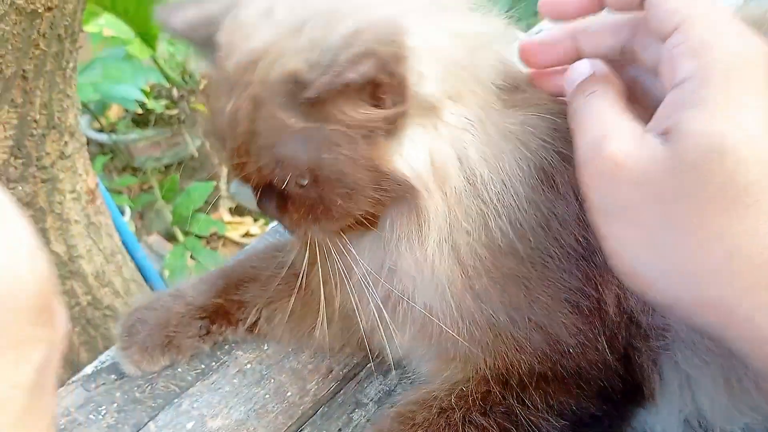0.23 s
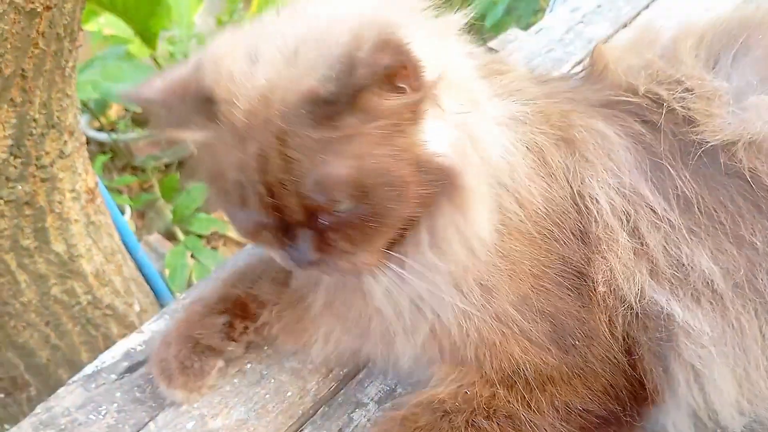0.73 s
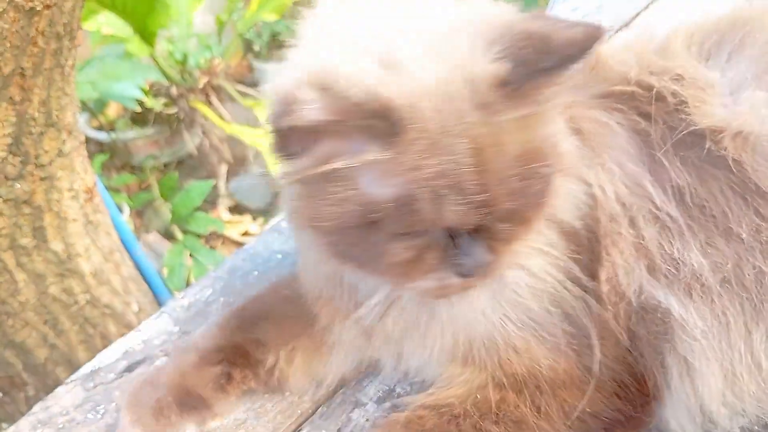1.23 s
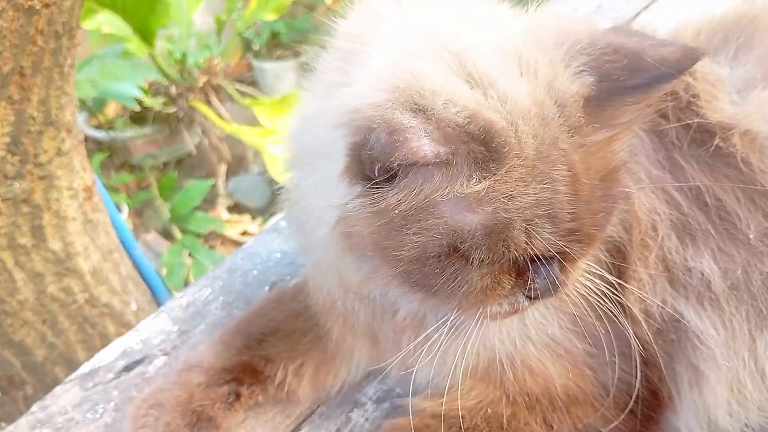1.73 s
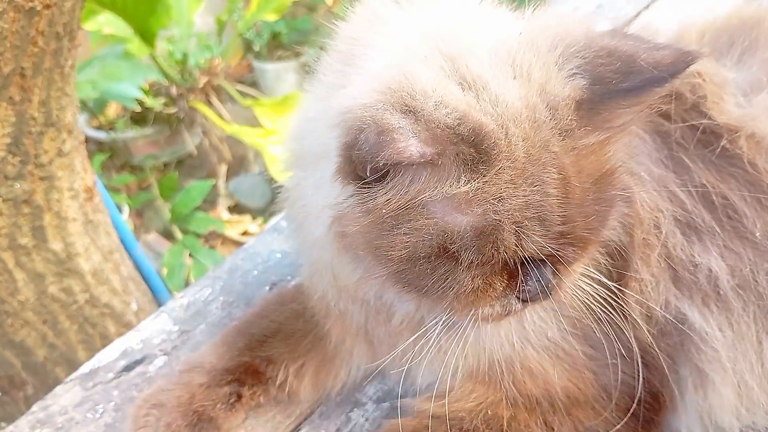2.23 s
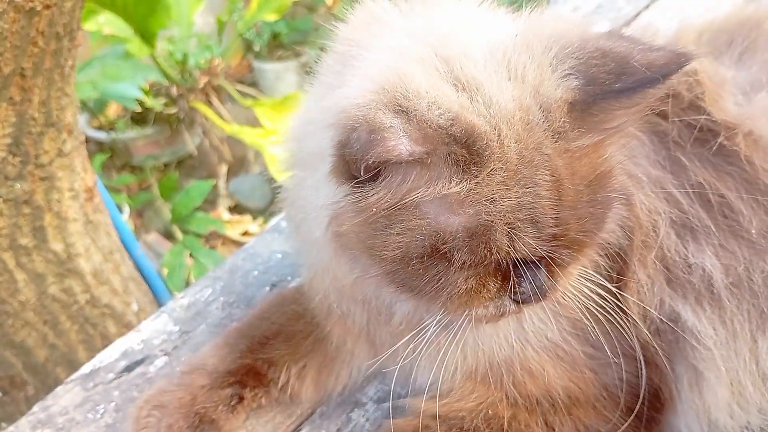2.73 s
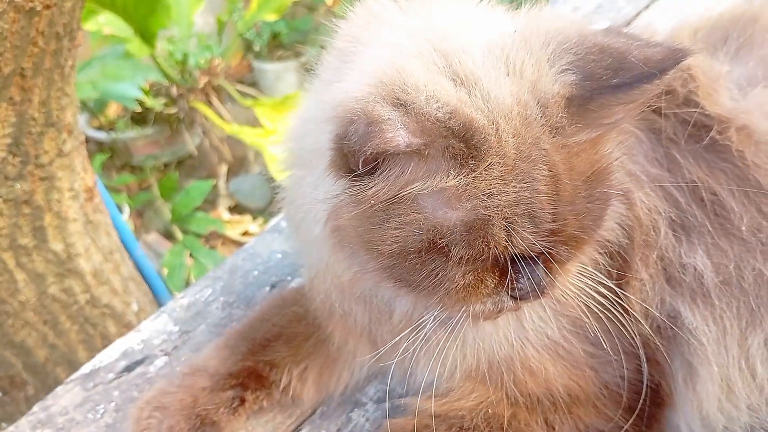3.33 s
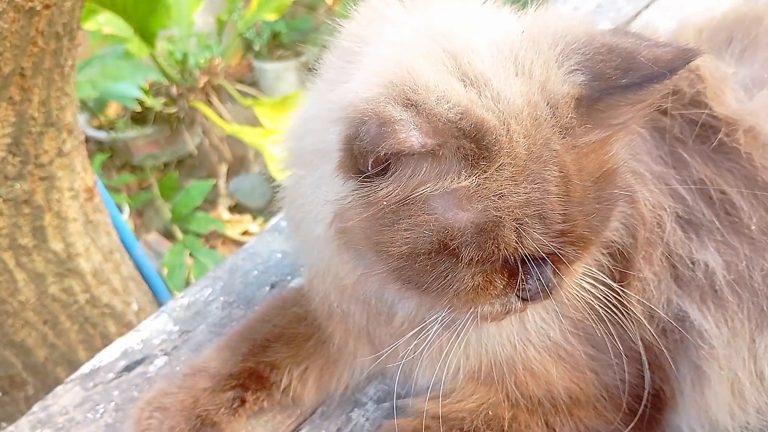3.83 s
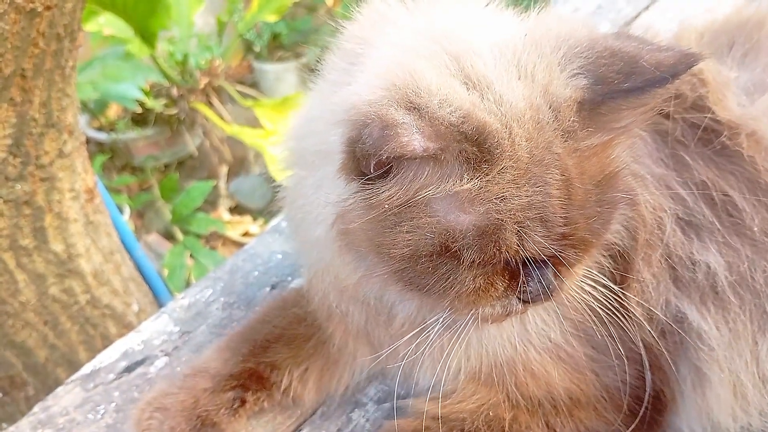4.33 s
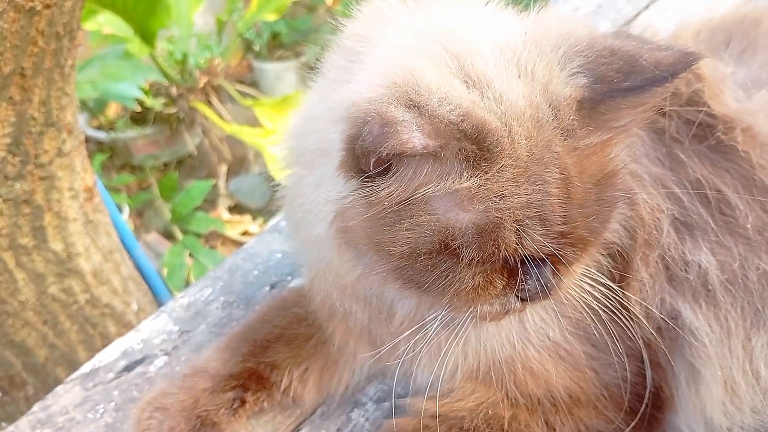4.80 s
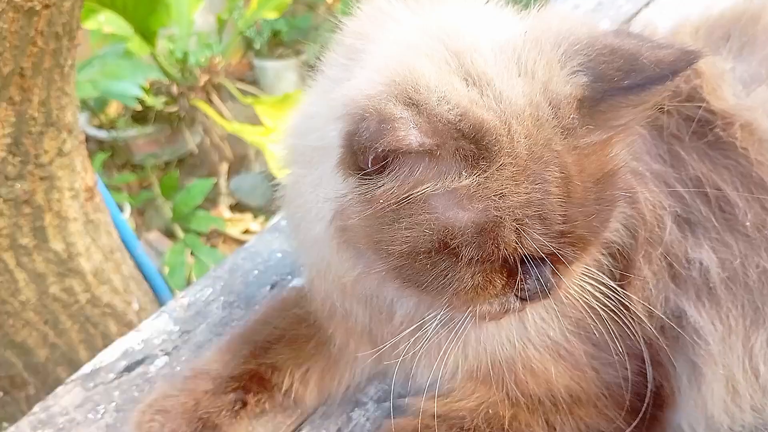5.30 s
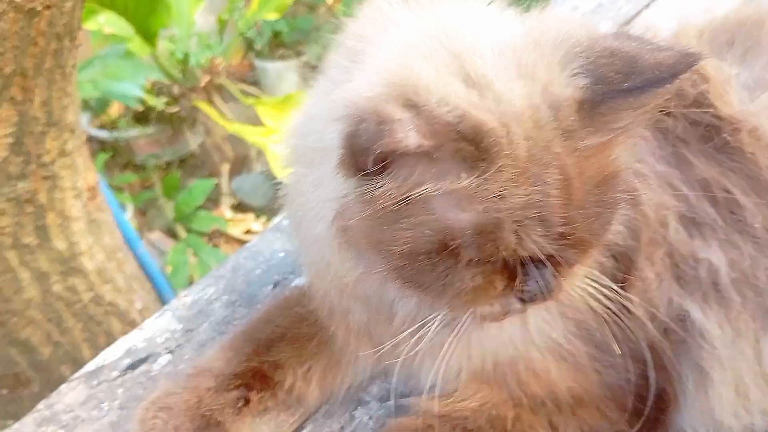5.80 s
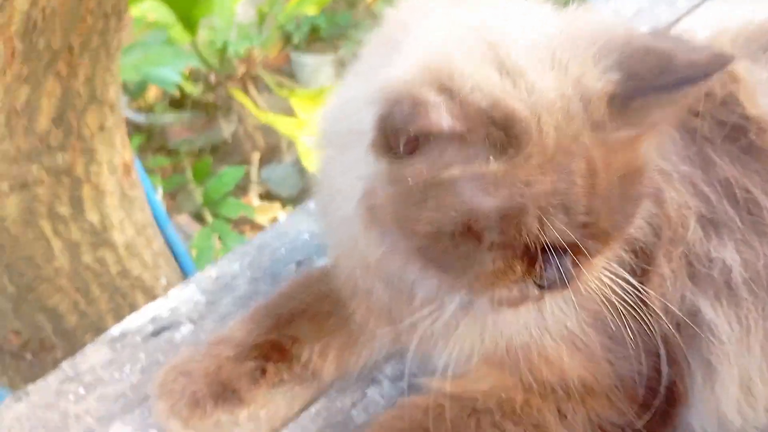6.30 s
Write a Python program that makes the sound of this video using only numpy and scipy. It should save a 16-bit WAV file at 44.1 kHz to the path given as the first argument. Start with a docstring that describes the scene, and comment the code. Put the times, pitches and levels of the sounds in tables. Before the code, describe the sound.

A quiet garden between house walls, with low traffic rumble, airy wash, faint high hiss and a distant motor throughout. A small bird gives a falling whistle and zigzag chirrup about every 0.6 seconds, pausing longer around 3 seconds; far birds pipe evenly, thin and blurred. A dove note fades at the start. Soft brushing comes near 0.4, small ticks at 0.8, then gritty metal scraping with brief squeals from 1 to 1.5. The dove coos from 1.0, strongest between 1.7 and 2.5, fluttering and rolling, ending near 3. A brush and one pure far whistle pass around 2.8, then wooden knocks at 3.05 and 3.25. Motor and whine swell around 3.7 to 4.3. Metal squeals brightly at 4.9 and again at 5.7 beside a firm brush. The dove returns from 5.2 to 6.2, with rustles, ticks and two knocks near 6.4 and a last coo starting at the end.

```python
"""A garden between house walls: filtered noise for traffic and air, motor harmonics, thin far tones.
From the start a small bird repeats gliding sine whistles and chirrups, and far birds pipe short arched sines.
Soft brushes and ticks (shaped noise) follow, and metal scrapes: noise-driven modes, with squealing sines.
A dove rolls through low phrases of near-sine coos; one pure far whistle sounds, then wooden modes knock.
The motor and whine swell, metal scrapes and squeals again, and the dove returns over late brushes and knocks."""
import sys
import numpy as np
from scipy import signal
from scipy.fft import rfft, irfft
from scipy.io import wavfile
from scipy.ndimage import uniform_filter1d

SR = 44100
rng = np.random.default_rng(int(sys.argv[2]) if len(sys.argv) > 2 else 0)


def unload_audio(sound):
    """Save the sound as a 16-bit wav file, at the path given as the first command line argument."""
    columns = np.transpose(np.atleast_2d(sound))
    # keep every value between -1 and 1, then stretch to whole-number steps
    steps = np.round(np.clip(columns, -1, 1) * 32767)
    wavfile.write(sys.argv[1], SR, steps.astype(np.int16))


N = 288855
TIME_S = np.arange(N) / SR

# Background levels. Each row: time in seconds, traffic in dB, open air in dB, high hiss in dB before its share.
BACKGROUND_LEVELS = [(0, -40, -45.5, -59), (1.2, -42.5, -46.5, -59), (1.7, -44.5, -48.5, -58),
                     (2.5, -46, -43.5, -50.5), (3.3, -42, -46, -53.5), (4.3, -43.5, -47, -55),
                     (5, -39, -46, -59.5), (5.6, -45.5, -43.5, -55), (6.55, -38.5, -45, -62)]
# Noise colours. Each row: frequency in Hz, density in dB per Hz.
TRAFFIC_COLOUR = [(30, -25), (50, -27), (63, -7), (77, 1.5), (100, 4), (125, -6), (180, -9.5), (260, -18.5),
                  (500, -55.5)]
AIR_COLOUR = [(100, -5.5), (200, 1.5), (300, 1.5), (500, -4.5), (800, -6), (1200, -12.5), (1700, -11),
              (2200, -15.5), (3200, -16.5), (5000, -23.5), (7000, -39.5), (12000, -51)]
HISS_COLOUR = [(2000, -6), (3000, -1), (3900, 14.5), (4500, -4.5), (5100, -18), (7000, -92)]
MIC_HISS_COLOUR = [(2500, -18), (5000, 0.5), (7000, -3.5), (9000, -3), (12000, -11), (16000, -14)]
MIC_HISS_DB = -65
# Garden reverberation. Each row: frequency in Hz, T60 in seconds.
GARDEN_T60 = [(100, .5), (650, 0.61), (3000, 0.14), (8000, 0.24)]
CUTOFF_HZ = 15600

# Far motor. Each row: time in seconds, firings per second, level in dB.
MOTOR_CURVE = [(0, 26.6, -48.5), (3.2, 21.8, -42.5), (3.7, 23, -38), (4.1, 24.4, -37), (5, 24.3, -42.5),
               (5.5, 22.9, -45.5), (6.55, 24.5, -47.5)]
# Motor harmonics. Each row: multiple of the firing rate, relative level in dB.
MOTOR_ORDERS = [(2, -19), (4, 2.5), (6, -2), (7, 0), (8, -6), (12, -12.5)]

# Far tones: thin whine, high trill, one long clean whistle. Each row: time in seconds, pitch in Hz, level in dB.
WHINE_CURVE = [(0, 3340, -66), (.95, 3080, -67), (1.6, 3130, -62), (2.4, 3065, -57), (2.8, 3150, -62),
               (3.1, 3096, -61), (3.7, 3100, -52), (4.3, 3010, -54), (5, 3037, -57), (6.55, 2994, -67)]
TRILL_CURVE = [(0, 4410, -64), (1.7, 4314, -61), (2.2, 4580, -56), (2.6, 4507, -60), (3.3, 4420, -59),
               (4, 4290, -60.5), (4.8, 4207, -59), (5.5, 4076, -66), (6.55, 3996, -67)]
LONG_WHISTLE_CURVE = [(2.74, 3116, -62), (2.77, 3160, -45), (2.805, 3160, -44), (2.85, 3110, -51),
                      (2.89, 3040, -50), (2.945, 3170, -47), (2.975, 3150, -68)]

# Thin far notes, pitched below the trill, following the high hiss in strength.
CHORUS_PER_S, CHORUS_DB, CHORUS_SPAN_HZ = 55, -3, 998
# Evenly paced far piping. Each row: time in seconds, pitch in Hz, level in dB.
PIPING_CURVE = [(.06, 1830, -43.5), (.22, 1858, -42.5), (.54, 1817, -42), (.86, 1808, -43.5),
                (1.18, 1793, -47.5), (1.5, 1788, -51.5), (2, 1805, -56.5), (2.45, 1697, -55),
                (2.77, 1575, -58), (2.95, 1582, -49), (3.25, 1573, -49.5), (3.41, 1647, -47),
                (3.57, 1642, -43), (3.89, 1627, -50.5), (4.05, 1700, -56.5), (4.35, 1702, -53),
                (4.52, 1779, -51), (4.68, 1821, -51), (5.5, 1771, -50.5), (6.5, 1780, -55)]
FIRST_PIPE_S, PIPE_EVERY_S = .052, .159
# Shares of the pitch: mean sag over a pipe; droop at both ends of any far note.
PIPE_FALL, FAR_ARCH = .015, 0.0225
# Lower answers of a second far bird, then faint high chips of another.
# Each row: start in seconds, pitch in Hz, level in dB, fall as a share of the pitch.
ANSWERS = [(-.02, 1720, -41.5, 0.082), (.08, 1597, -45.5, 0.024), (.17, 1567, -43, 0.015),
           (.375, 1710, -53, 0.097), (.585, 1640, -48, 0.152), (.88, 1665, -48, 0.18)]
CHIPS = [(.55, 5600, -56, 0.13), (1.08, 5450, -53, 0.089), (3.185, 5780, -50.5, 0.089),
         (3.24, 5570, -65, 0.079), (3.87, 5410, -47, 0.15), (4.03, 4630, -49, .02)]

# Metal scrapes, perhaps a gate. Each row: start, peak and end in seconds, level in dB,
# grit and hiss in dB against the ring.
SCRAPES = [(0.974, 1.015, 1.22, -49, 2.5, -13), (1.148, 1.203, 1.51, -48, 5.5, -18),
           (1.31, 1.39, 1.5, -49.5, 8.5, -32), (4.785, 4.903, 5.12, -40.5, -10, -8.5),
           (5.687, 5.76, 5.87, -41, -12, -12.5)]
# Metal modes of the ring, then of the bite. Each row: frequency in Hz, half bandwidth in Hz, level in dB.
SCRAPE_MODES = [(2320, 14, -6), (2406, 18, -2), (2680, 18, -8), (2860, 9.7, -0.5), (3000, 37, -3.5),
                (3290, 5.6, -2.5), (3600, 40, -14), (3830, 15, -13), (4900, 78, -24.5)]
BITE_MODES = [(6050, 60, -12), (6820, 69.8, -9), (7750, 50, -6), (8300, 34.6, 1), (8600, 44, -9),
              (12200, 70, -12)]
# Friction noise colours. Each row: frequency in Hz, density in dB per Hz.
SCRAPE_GRIT_COLOUR = [(1400, -24), (2300, 10), (2900, 6), (4500, -33), (8400, -21), (13500, -37)]
SCRAPE_HISS_COLOUR = [(4500, -26), (6000, -9), (7400, -6), (8250, 6), (9200, -12), (11500, -25),
                      (12200, -15), (13200, -27)]
HISS_ATTACK_S, HISS_FADE_DB_PER_S = 0.053, 82
BITE_RING_DB = -1.5   # against the hiss
# Tiny slips within the grit.
SQUEAKS_PER_S, SQUEAK_S, SQUEAK_HZ, SQUEAK_SPREAD_OCTAVES = 230, 0.009, 2480, 0.2
# Friction locked into a squeal. Each row: start and end in seconds, pitch in Hz, level in dB.
SQUEALS = [(0.982, 1.05, 2414, -51), (1.258, 1.283, 2395, -47), (4.85, 5.045, 2396, -39),
           (5.701, 5.762, 3260, -37.5), (5.8, 5.865, 2880, -46), (4.9, 4.998, 3293, -51)]
SQUEAL_ATTACK_S, SQUEAL_RELEASE_S = 0.005, 0.065

# Brushes of fur and cloth. Each row: start, peak and end in seconds, level in dB, centre in Hz, width in octaves.
BRUSHES = [(0.275, 0.429, 0.487, -44, 5800, 1.7), (0.29, 0.422, 0.48, -41, 1250, 2.8),
           (1.36, 1.435, 1.52, -44.5, 1530, 0.76), (2.501, 2.727, 2.92, -41, 1430, 2.5),
           (2.945, 2.984, 3.14, -42, 3000, 3.1), (5.727, 5.777, 5.87, -35, 1580, 0.67),
           (5.725, 5.772, 5.85, -30.5, 862, 0.37), (5.706, 5.77, 5.9, -47, 3400, 1.96),
           (6.1, 6.297, 6.42, -43.5, 1520, 0.47), (6.32, 6.405, 6.47, -37.5, 1560, 0.65),
           (3.03, 3.06, 3.12, -43, 1200, .9), (2.6, 2.78, 2.88, -59, 9000, 1.7),
           (6.25, 6.39, 6.45, -57, 6100, 1.8)]
BRUSH_GRAIN_DB = 2.2
# Small close ticks. Each row: start in seconds, dry peak in dB, T60 of the crackle in seconds.
TICKS = [(0.8232, -34.5, 0.027), (0.869, -39, .025), (1.3979, -41, .06), (1.4238, -45, 0.027),
         (1.4325, -35, 0.025), (1.4977, -39.5, 0.067), (2.951, -37.5, .08), (4.308, -36.5, 0.17),
         (4.5037, -38.5, 0.095), (6.3, -42, .03), (6.356, -43, .08), (6.394, -42, 0.052), (6.416, -42, .05)]
# Light knocks, perhaps on the wooden bench. Each row: start in seconds, dry peak in dB.
KNOCKS = [(3.051, -22.5), (3.2445, -37), (6.353, -24.5), (6.412, -28)]
# Modes of ticks and knocks. Each row: frequency in Hz, level in dB, T60 in seconds.
TICK_MODES = [(4900, -17, .006), (6030, 7, 0.0053), (7700, 0, 0.0046), (9040, 11, 0.0047),
              (11400, -15, .005)]
KNOCK_MODES = [(850, -6, 0.049), (1150, -8, 0.017), (1367, -2.5, 0.045), (1503, 0.5, 0.043),
               (2040, -21, .02)]

# Small bird's songs. Each row: start in seconds, delay to the chirrup in seconds, level in dB,
# whistle pitch ratio, chirrup pitch ratio.
SONGS = [(-.1, 0.21, -36, 1.017, 0.96), (.482, 0.19, -35, 0.99, 1.013), (1.07, 0.21, -37, 1, 0.96),
         (1.73, 0.2, -36, 1, 0.98), (2.382, 0.22, -35.5, .97, 0.99), (3.61, 0.2, -35, .99, 1),
         (4.274, .206, -33.5, 1.012, 1.01), (5.14, 0.19, -35.5, 1.005, 0.96),
         (5.806, 0.21, -35.5, 0.98, 0.99)]
# Its two notes. Each row: time in the note in seconds, pitch in Hz, relative level in dB,
# rasp as a share of the pitch.
WHISTLE_SHAPE = [(0, 3240, -34, .01), (.014, 3400, -9.5, .02), (.031, 3720, -8, 0.032),
                 (.037, 4330, -5, .01), (.047, 3920, -4, .012), (.064, 3700, -10, 0.016),
                 (.088, 3600, -4, .006), (.112, 3500, -1, 0.0025), (.128, 3473, -6, .003),
                 (.15, 3470, -21, .003)]
CHIRRUP_SHAPE = [(.002, 2970, -24, .01), (.014, 3090, 3.5, .006), (.028, 3066, 2.5, .012),
                 (.038, 2640, -2.5, .045), (.049, 2250, -7, .05), (.056, 2600, -17, .06),
                 (.061, 3100, -4, .05), (.067, 3900, -18, .02), (.073, 4210, -4.5, .015),
                 (.085, 3850, -1.5, .022), (.095, 3100, -1.5, .022), (.106, 2850, -2.5, 0.0093),
                 (.13, 2835, -13, .008)]
CHIRRUP_DB = -3   # against the whistle
WALL_ECHO_S, WALL_ECHO_DB = .032, -6.5   # one distinct wall

# Dove notes. Each row: start, loudest moment and end in seconds, level in dB, pitch, scoop and sag in Hz,
# roughness at the onset, roughness later (both 0 to 1).
COO_NOTES = [(-.05, 0, .14, -37, 645, 45, 87, .1, 0.41),
             (1.036, 1.078, 1.08, -34.5, 705, 108, 12, 0.6, .49),
             (1.127, 1.168, 1.275, -32.5, 698, 18.3, 38, .2, .055),
             (1.472, 1.5, 1.507, -31.5, 698, 42, 10.7, 0.9, 0.51),
             (1.544, 1.595, 1.66, -35, 690, 60, 15, .95, 0.9),
             (1.683, 1.735, 1.73, -31.5, 660, 39, 5, 0.55, .85),
             (1.735, 1.758, 1.805, -25.5, 738, 35, 8.2, 0.4, 0.53),
             (1.818, 1.865, 1.975, -22, 728, 4.6, 57, .35, .08),
             (1.979, 1.992, 2.025, -26.5, 680, 28.5, 8.9, .8, 0.77),
             (2.037, 2.055, 2.165, -28, 684, 29, 33.6, 0.4, 0.082),
             (2.17, 2.192, 2.198, -25.5, 655, 5, 15, 0, 0.043),
             (2.214, 2.23, 2.315, -24, 725, 29.4, 7.7, 0.34, 0.56),
             (2.326, 2.33, 2.415, -27, 712, 5.2, 44, 0.38, 0.37),
             (2.422, 2.444, 2.525, -27.5, 672, 32.4, 34, .7, 0.73),
             (2.836, 2.882, 2.925, -29, 690, 110.7, 36, 0.62, 0.65),
             (2.932, 2.963, 3, -29.5, 668, 46, 10.8, 0.46, 0.52),
             (5.183, 5.21, 5.24, -31.5, 682, 67, 21.6, 0.5, 0.51),
             (5.261, 5.3, 5.33, -37, 672, 48, 4.9, .5, .2),
             (5.424, 5.465, 5.51, -24, 733, 33, 3.4, 0.6, 0.47),
             (5.519, 5.554, 5.65, -22, 730, 5.4, 46, 0.2, 0.027),
             (5.667, 5.674, 5.785, -27.5, 668, 35, 5.16, 0.52, 0.63),
             (5.917, 5.975, 6.11, -24.5, 730, 35, 63, .15, 0.45),
             (6.121, 6.138, 6.215, -24.5, 660, 13.7, 30, .35, 0.54),
             (6.52, 6.555, 6.65, -34.5, 610, 44, 25, 0.72, .67)]
COO_ATTACK_S, COO_RELEASE_S = 0.0141, 0.016
COO_SETTLE_S = 0.024   # roughness changes over this time before the loudest moment
COO_SWELL_DB, COO_FADE_DB = 4, 8   # rise to the loudest moment, fall from it to the end
COO_SCOOP_S, COO_SAG_POWER = .019, 1.7   # slide up into the pitch; ever faster sag
COO_BLEND_S = .008   # one note passes into the next
# Soft downward slides that end phrases. Each row: start in seconds, pitch in Hz, level in dB,
# fall as a share of the pitch.
COO_SLIDES = [(2.405, 507, -38, 0.25), (2.87, 511, -46.5, 0.27), (6.11, 505.4, -36, 0.203)]


def from_db(db):
    """Decibels to gain."""
    return 10 ** (np.asarray(db) / 20)


def rms_one(x):
    """Scale to unit rms."""
    return x / np.sqrt(np.mean(x ** 2) + 1e-20)


def in_time(rows, t=TIME_S):
    """Columns of a curve, joined by straight lines."""
    s, *columns = np.transpose(rows)
    return [np.interp(t, s, column) for column in columns]


def at_hz(points, hz):
    """Read a spectrum on a log-frequency axis."""
    f, value = np.transpose(points)
    return np.interp(np.log(np.maximum(hz, 1)), np.log(f), value)


def drift(rate_hz):
    """Low-passed chance of rms 1, mostly slower than the rate."""
    f = np.arange(N // 2 + 1) * SR / N
    spectrum = rfft(rng.standard_normal(N)) / (1 + (f / rate_hz) ** 2)
    return rms_one(irfft(spectrum, N))


def noise(colour):
    """Noise of a given colour, rms 1."""
    f = np.arange(N // 2 + 1) * SR / N
    spectrum = rfft(rng.standard_normal(N)) * from_db(at_hz(colour, f))
    return rms_one(irfft(spectrum, N))


def band(x, low_hz, high_hz, order=2):
    """Butterworth band-pass."""
    edges_hz = [low_hz, min(high_hz, SR / 2 - 1000)]
    return signal.sosfilt(signal.butter(order, edges_hz, "band", fs=SR, output="sos"), x)


def resonate(x, modes):
    """Drive narrow resonances side by side; rms 1."""
    total = 0
    for hz, half_width_hz, db in modes:
        b, a = signal.iirpeak(hz, hz / (2 * half_width_hz), fs=SR)
        total = total + from_db(db) * signal.lfilter(b, a, x)
    return rms_one(total)


def phase_of(hz):
    """Running phase of a gliding pitch."""
    return 2 * np.pi * np.cumsum(hz) / SR


def add(out, start_s, sound):
    """Mix a sound in at a time, trimmed at both ends."""
    at = int(round(start_s * SR)) + np.arange(len(sound))
    inside = (at >= 0) & (at < N)
    out[at[inside]] += sound[inside]


def garden(x, hz, wet_db, first_s):
    """Direct sound plus scattered echoes from walls and trees, scaled to hold the overall power."""
    t = np.arange(SR * 3 // 4) / SR
    hits = rng.random(len(t)) < (600 + 12000 * t) / SR
    decay = from_db(-60 * t / at_hz(GARDEN_T60, hz))
    echoes = rng.standard_normal(len(t)) * hits * (t > first_s) * decay
    wet = signal.fftconvolve(x, echoes / np.sqrt(np.sum(echoes ** 2)))[:N]
    return (x + from_db(wet_db) * wet) / np.sqrt(1 + from_db(2 * wet_db))


def background(hiss_share_db=-3.5):
    """Traffic rumble, the wash of open air, high hiss of far insects and steady microphone hiss."""
    traffic_db, air_db, hiss_db = in_time(BACKGROUND_LEVELS)
    traffic = from_db(traffic_db + 2.43 * drift(10)) * noise(TRAFFIC_COLOUR)
    air = from_db(air_db + 1.6 * drift(10.7)) * noise(AIR_COLOUR)
    hiss = from_db(hiss_db + hiss_share_db + 0.89 * drift(8.4)) * noise(HISS_COLOUR)
    return traffic + air + hiss + from_db(MIC_HISS_DB) * noise(MIC_HISS_COLOUR)


def motor():
    """Multiples of the firing rate, each fading on its own on the long way."""
    rate_hz, db = in_time(MOTOR_CURVE)
    phase = phase_of(rate_hz * (1 + 0.0092 * drift(5.8)))
    lines = np.zeros(N)
    for multiple, level_db in MOTOR_ORDERS:
        line = np.sin(multiple * phase + 2 * np.pi * rng.random())
        lines += from_db(level_db + 3.6 * drift(8.5)) * line
    return from_db(db) * rms_one(lines)


def far_tone(curve, waver, fade_db, grain):
    """A thin wavering tone that fades in and out and arrives mostly as echo."""
    pitch_hz, db = in_time(curve)
    phase = phase_of(pitch_hz * (1 + waver * drift(8) + grain * drift(152.0)))
    tone = from_db(db + fade_db * drift(6.1)) * np.sin(phase)
    return garden(tone, 2800, wet_db=13.5, first_s=0.02)


def far_bird(calls, length_s, rasp):
    """Short arched notes that sag in pitch and quiver, blurred by distance."""
    out, u = np.zeros(N), np.linspace(0, 1, int(length_s * SR))
    arch = np.sin(np.pi * u)
    for start_s, hz, db, fall in calls:
        quiver = rms_one(band(rng.standard_normal(len(u)), 30, 300))
        bend = fall * (.5 - u) + FAR_ARCH * (arch - 1)
        phase = phase_of(hz * (1 + bend + rasp * quiver))
        add(out, start_s, from_db(db) * arch * np.sin(phase))
    return garden(out, 2040, wet_db=-0.5, first_s=.008)


def chorus(scatter_db=2.0, fall=0.0178):
    """Thin far notes at random moments: rows of time, pitch, level and fall."""
    slots_s = np.arange(0, N / SR, 1 / CHORUS_PER_S)
    late, low = rng.random((len(slots_s), 2)).T
    size, slide = rng.standard_normal((len(slots_s), 2)).T
    top_hz = in_time(TRILL_CURVE, slots_s)[0]
    hiss_db = in_time(BACKGROUND_LEVELS, slots_s)[-1]
    level_db = hiss_db + CHORUS_DB + scatter_db * size
    return np.transpose([slots_s + late / CHORUS_PER_S, top_hz - CHORUS_SPAN_HZ * low, level_db, fall * slide])


def pipes(jitter_s=.005, scatter_hz=5, scatter_db=0.3):
    """Nearly evenly paced calls, no two alike: rows of time, pitch, level and fall."""
    times_s = np.arange(FIRST_PIPE_S, N / SR, PIPE_EVERY_S)
    calls = np.transpose([times_s, *in_time(PIPING_CURVE, times_s)])
    calls = calls + rng.standard_normal(calls.shape) * [jitter_s, scatter_hz, scatter_db]
    falls = PIPE_FALL * (1 + .5 * rng.standard_normal(len(calls)))
    return np.column_stack([calls, falls])


def long_whistle(waver=0.0017):
    """A far bird holds one pure, gently swaying note."""
    pitch_hz, db = in_time(LONG_WHISTLE_CURVE)
    held = (TIME_S > LONG_WHISTLE_CURVE[0][0]) & (TIME_S < LONG_WHISTLE_CURVE[-1][0])
    phase = phase_of(pitch_hz * (1 + waver * drift(39)))
    return garden(held * from_db(db) * np.sin(phase), 3100, wet_db=-7, first_s=.02)


def squeaks(glide=0.1, scatter_db=3):
    """A random scatter of tiny gliding squeaks, rms 1."""
    out, u = np.zeros(N), np.linspace(0, 1, int(SQUEAK_S * SR))
    slots_s = np.arange(0, N / SR, 1 / SQUEAKS_PER_S)
    chances = rng.standard_normal((len(slots_s), 4))
    for slot_s, (late, high, slide, size) in zip(slots_s, chances):
        pitch_hz = SQUEAK_HZ * 2 ** (SQUEAK_SPREAD_OCTAVES * high) * (1 + glide * slide * (u - .5))
        swell = from_db(scatter_db * size) * np.sin(np.pi * u) * (1 - u)
        add(out, slot_s + late / SQUEAKS_PER_S, swell * np.sin(phase_of(pitch_hz)))
    return rms_one(out)


def scrapes(edge_db=-13, grain_db=2.6, rub_db=-5.5, squeak_db=-1.5):
    """Friction bites with a bright hiss, then grinds on in uneven slips, ringing narrow metal modes."""
    out, grain = np.zeros(N), from_db(grain_db * drift(90))
    grit = from_db(rub_db) * grain * noise(SCRAPE_GRIT_COLOUR) + from_db(squeak_db) * squeaks()
    friction = grain * rng.standard_normal(N)
    hiss = grain * noise(SCRAPE_HISS_COLOUR) + from_db(BITE_RING_DB) * resonate(friction, BITE_MODES)
    ringing = resonate(friction, SCRAPE_MODES)
    for start_s, peak_s, end_s, db, grit_db, hiss_db in SCRAPES:
        at = np.arange(int(start_s * SR), int(end_s * SR))
        age_s = at / SR - start_s
        swell = from_db(np.interp(at / SR, [start_s, peak_s, end_s], [edge_db, 0, edge_db]))
        fade_db = HISS_FADE_DB_PER_S * np.maximum(age_s - HISS_ATTACK_S, 0)
        bite = np.clip(age_s / HISS_ATTACK_S, 0, 1) * from_db(hiss_db - fade_db)
        sound = swell * (ringing[at] + from_db(grit_db) * grit[at]) + bite * hiss[at]
        add(out, start_s, from_db(db) * signal.windows.tukey(len(at), .1) * sound)
    return out


def squeals(waver=0.0041, grain_db=3.0):
    """One mode takes over, keeps its pitch but for a slight waver, shakes in level, then rings out."""
    out, shake = np.zeros(N), from_db(grain_db * drift(45))
    wobble = 1 + waver * drift(64)
    for start_s, end_s, hz, db in SQUEALS:
        attack = np.clip((TIME_S - start_s) / SQUEAL_ATTACK_S, 0, 1)
        release = np.exp(-np.maximum(TIME_S - end_s, 0) / SQUEAL_RELEASE_S)
        out += from_db(db) * attack * release * shake * np.sin(phase_of(hz * wobble))
    return out


def brushes(edge_db=-20):
    """Many hairs and fibres slip at once: grainy noise that swells and dies."""
    out, grain = np.zeros(N), from_db(BRUSH_GRAIN_DB * drift(200))
    for start_s, peak_s, end_s, db, hz, octaves in BRUSHES:
        at = np.arange(int(start_s * SR), min(int(end_s * SR), N))
        swell_db = np.interp(at / SR, [start_s, peak_s, end_s], [edge_db, 0, edge_db])
        swell = from_db(db + swell_db) * signal.windows.tukey(len(at), .2)
        half_span = 2 ** (octaves / 2)
        slips = band(rng.standard_normal(len(at)), hz / half_span, hz * half_span, order=3)
        add(out, start_s, swell * rms_one(slips * grain[at]))
    return out


def ticks(ring_db=-5, first_snap=11):
    """Tiny bursts of snaps ring a few high, damped modes and echo briefly."""
    out, t = np.zeros(N), np.arange(SR // 10) / SR
    body = sum(from_db(db - 60 * t / t60_s) * np.sin(2 * np.pi * hz * t) for hz, db, t60_s in TICK_MODES)
    for start_s, db, t60_s in TICKS:
        # cubing leaves a few strong snaps among many weak ones
        snaps = np.clip(rng.standard_normal(len(t)) ** 3, -first_snap, first_snap) * from_db(-60 * t / t60_s)
        snaps[0] = first_snap
        ring = rms_one(signal.fftconvolve(snaps, body)[:len(t)])
        tick = rms_one(band(snaps, 2900, 10800)) + from_db(ring_db) * ring
        add(out, start_s, from_db(db) * tick / np.abs(tick).max())
    return garden(out, 8000, wet_db=-10, first_s=.008)


def knocks(crack_db=-9, crack_t60_s=0.015):
    """A short crack and a few well damped wooden modes."""
    out, t = np.zeros(N), np.arange(SR // 10) / SR
    for start_s, db in KNOCKS:
        body = np.zeros(len(t))
        for hz, level_db, t60_s in KNOCK_MODES:
            decay = from_db(level_db + rng.standard_normal() - 60 * t / t60_s)
            body += decay * np.sin(2 * np.pi * hz * t)
        crack = band(rng.standard_normal(len(t)) * from_db(-60 * t / crack_t60_s), 700, 2600)
        knock = body + from_db(crack_db) * crack / np.abs(crack).max()
        add(out, start_s, from_db(db) * knock / np.abs(knock).max())
    return garden(out, 3300, wet_db=-9, first_s=.006)


def note(shape, level_db, ratio, waver):
    """One whistled note, never quite the same twice; where the syrinx rasps, the pitch zigzags quickly."""
    t = np.arange(int(shape[-1][0] * SR)) / SR
    pitch_hz, db, rasp = in_time(shape, t)
    wobble = np.interp(t, np.linspace(0, t[-1], num=20), rng.standard_normal(20))
    tremor = rms_one(band(rng.standard_normal(len(t)), 105, 277))
    phase = phase_of(pitch_hz * ratio * (1 + waver * wobble + rasp * tremor))
    return np.sqrt(2) * from_db(level_db + db) * np.sin(phase)


def small_bird(direct_db=-3, walls_db=-2.5, walls_t60_s=0.18):
    """A falling whistle answered by a quick zigzag chirrup, repeated by the walls around."""
    out = np.zeros(N)
    for start_s, delay_s, db, whistle_ratio, chirrup_ratio in SONGS:
        add(out, start_s, note(WHISTLE_SHAPE, db, whistle_ratio, waver=0.0034))
        add(out, start_s + delay_s, note(CHIRRUP_SHAPE, db + CHIRRUP_DB, chirrup_ratio, waver=0.0067))
    echo = from_db(WALL_ECHO_DB) * np.interp(TIME_S - WALL_ECHO_S, TIME_S, out, left=0)
    # nearby walls return a cluster of early echoes
    t = np.arange(SR // 14) / SR
    hits = (rng.random(len(t)) < 700 / SR) * (t > .004)
    walls = rng.standard_normal(len(t)) * hits * from_db(-60 * t / walls_t60_s)
    early = signal.fftconvolve(out, walls / np.sqrt(np.sum(walls ** 2)))[:N]
    near = from_db(direct_db) * (out + echo) + from_db(walls_db) * early
    return garden(near, 5000, wet_db=-9, first_s=0.03)


def coo_controls():
    """Pitch, roughness, effort: each note scoops up, swells, then sags and fades as the breath runs out."""
    pitch_hz, rough, effort = np.zeros((3, N))
    for start_s, peak_s, end_s, db, hz, scoop_hz, sag_hz, onset_rough, later_rough in COO_NOTES:
        age_s = np.maximum(TIME_S - start_s, 0)
        spent = np.minimum(age_s / (end_s - start_s), 1.1)
        begun = TIME_S >= start_s - COO_ATTACK_S / 2
        bent_hz = hz - scoop_hz * np.exp(-age_s / COO_SCOOP_S) - sag_hz * spent ** COO_SAG_POWER
        pitch_hz = np.where(begun, bent_hz, pitch_hz)
        settling = np.interp(TIME_S, [peak_s - COO_SETTLE_S, peak_s], [onset_rough, later_rough])
        rough = np.where(begun, settling, rough)
        attack = np.clip((TIME_S - start_s) / COO_ATTACK_S + .5, 0, 1)
        release = np.exp(-np.maximum(TIME_S - end_s, 0) / COO_RELEASE_S)
        swell_db = np.interp(TIME_S, [start_s, peak_s, end_s], [-COO_SWELL_DB, 0, -COO_FADE_DB])
        effort = np.maximum(effort, attack * release * from_db(db + swell_db))
    return pitch_hz, rough, effort


def dove(roll_hz=76, roll_width_hz=52, roll_depth=0.95, overtone_db=-40):
    """A near-sine coo; in rolls the syrinx flutters and the swollen throat passes only lower side tones."""
    controls = np.array(coo_controls())
    pitch_hz, rough, effort = uniform_filter1d(controls, size=int(COO_BLEND_S * SR), axis=1)
    phase = phase_of(pitch_hz * (1 + 0.0045 * drift(28.5)))
    # irregular flutter smears its side tones into a band under the pitch
    chance = rng.standard_normal(N) + 1j * rng.standard_normal(N)
    smear = signal.sosfilt(signal.butter(3, roll_width_hz, fs=SR, output="sos"), chance)
    flutter = smear / np.std(smear) * np.exp(-2j * np.pi * roll_hz * TIME_S)
    rough = np.clip(rough, 0, .95)
    steady = np.sqrt(1 - rough ** 2)
    voice = np.imag(np.exp(1j * phase) * (steady + roll_depth * rough * flutter))
    voice = voice / np.sqrt(uniform_filter1d(voice ** 2, size=1300) + 1e-3)   # even out the level
    overtone = from_db(overtone_db) * np.sin(2 * phase)
    coos = garden(effort * (voice + overtone), 770, wet_db=-6.5, first_s=0.015)
    return coos + far_bird(COO_SLIDES, length_s=.18, rasp=.035)


def scene():
    """Birds, far machines, scraping metal and close rustles at one microphone."""
    far = background() + motor()
    far += far_tone(WHINE_CURVE, waver=0.008, fade_db=2.5, grain=0.00197)
    far += far_tone(TRILL_CURVE, waver=.013, fade_db=1.5, grain=0.00497)
    far_birds = far_bird(chorus(), length_s=0.1012, rasp=.007)
    far_birds += far_bird(pipes(), length_s=0.125, rasp=0.012)
    far_birds += far_bird(ANSWERS, length_s=0.09, rasp=0.015)
    far_birds += far_bird(CHIPS, length_s=0.0526, rasp=0.049) + long_whistle()
    metal = scrapes() + squeals()
    close = brushes() + ticks() + knocks()
    near_birds = small_bird() + dove()
    return (far + far_birds + metal + close + near_birds)[None, :]


def record(dry):
    """The microphone loses the deep bass; the top is cut."""
    thin = signal.sosfilt(signal.butter(2, 45, "high", fs=SR, output="sos"), dry)
    return signal.sosfilt(signal.ellip(10, .1, 80, CUTOFF_HZ, fs=SR, output="sos"), thin)


dry = scene()
out = record(dry)
unload_audio(out)
```